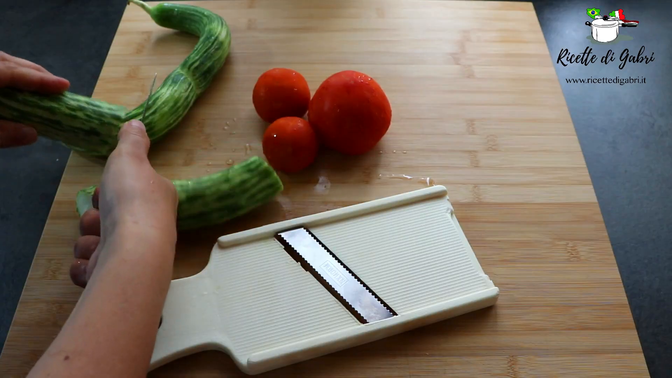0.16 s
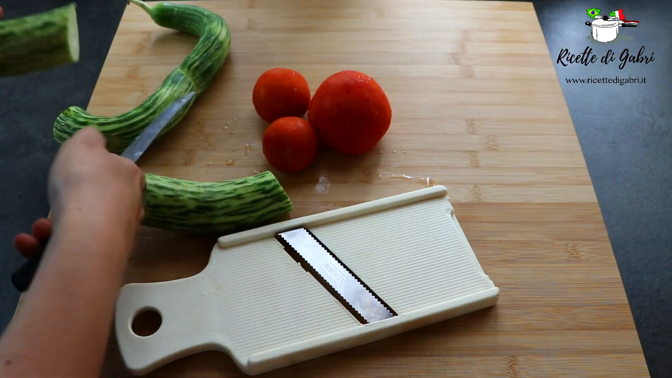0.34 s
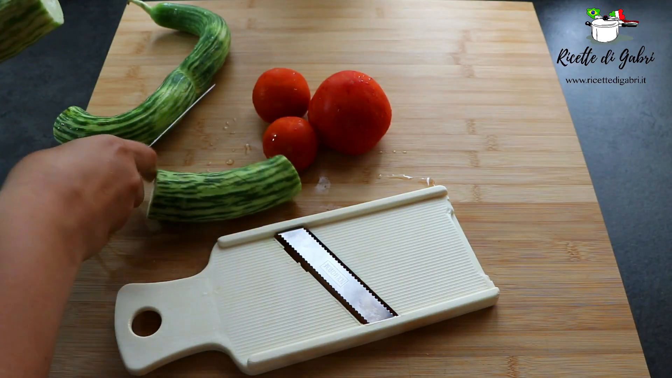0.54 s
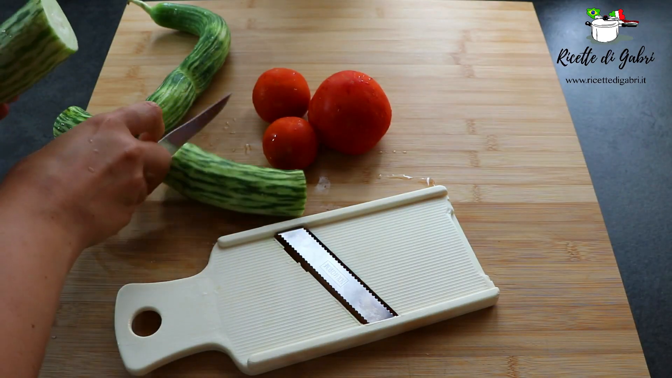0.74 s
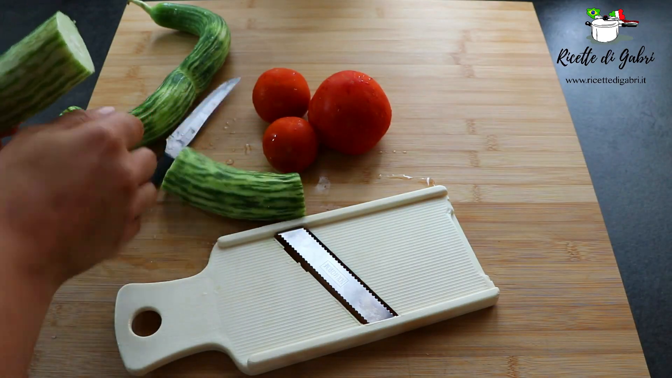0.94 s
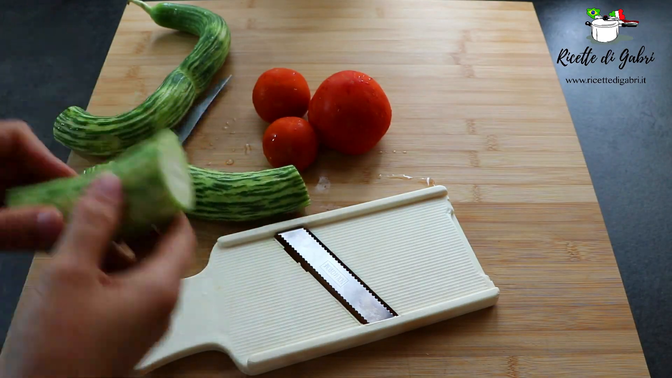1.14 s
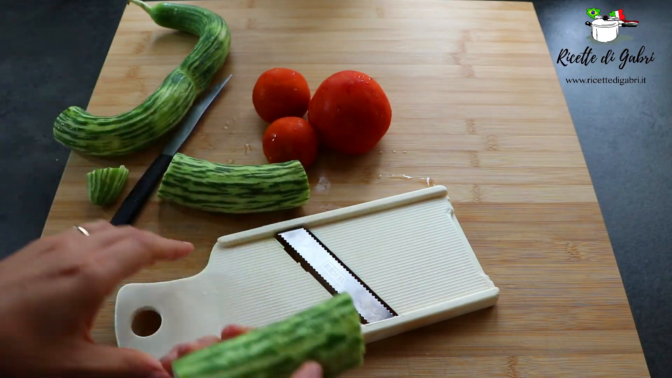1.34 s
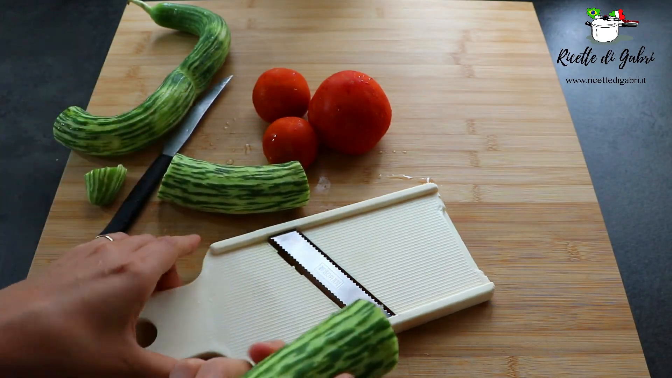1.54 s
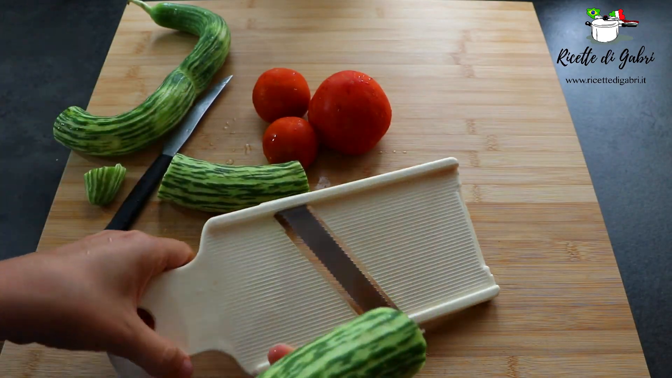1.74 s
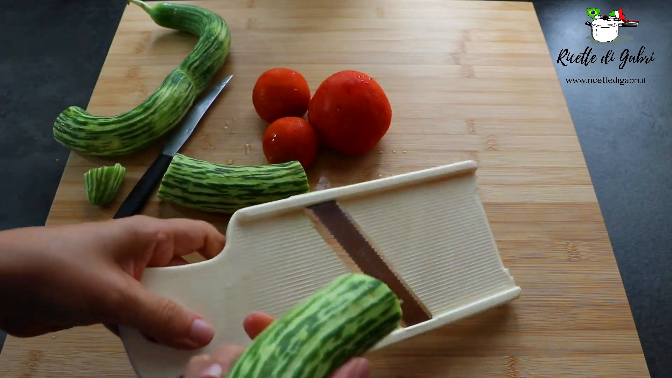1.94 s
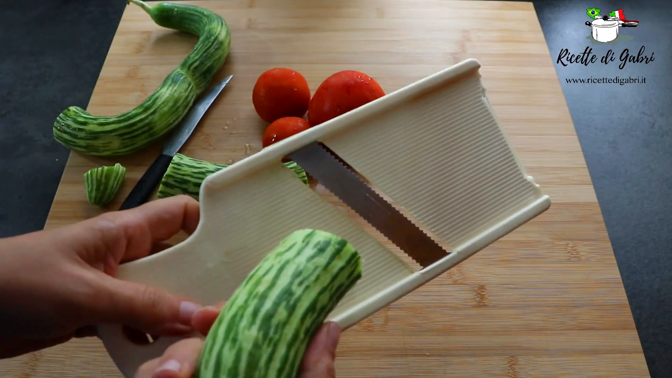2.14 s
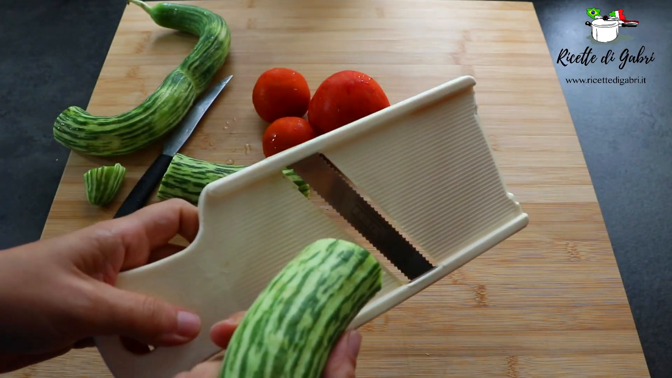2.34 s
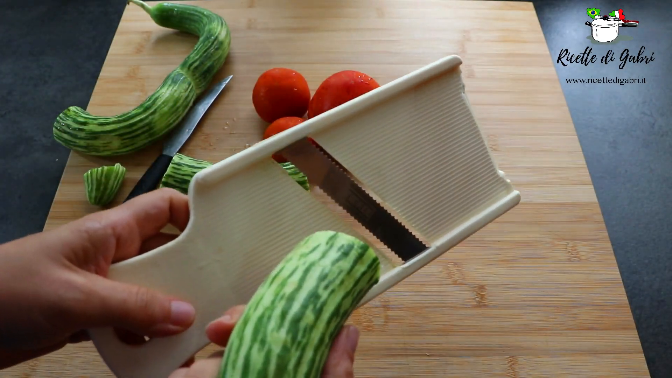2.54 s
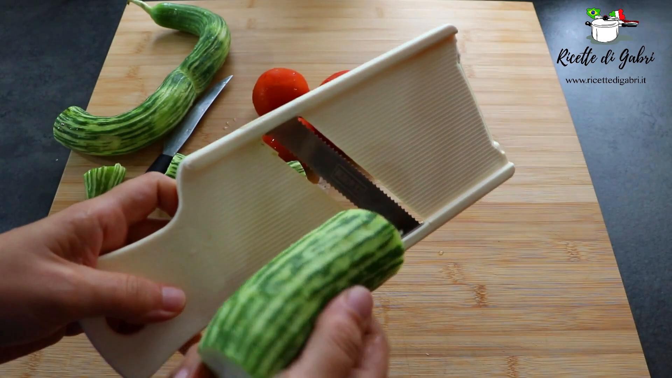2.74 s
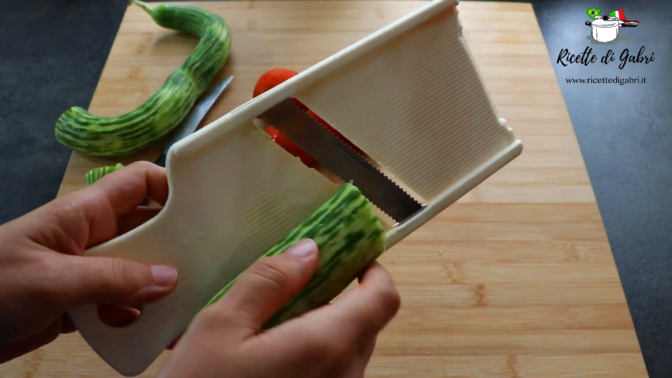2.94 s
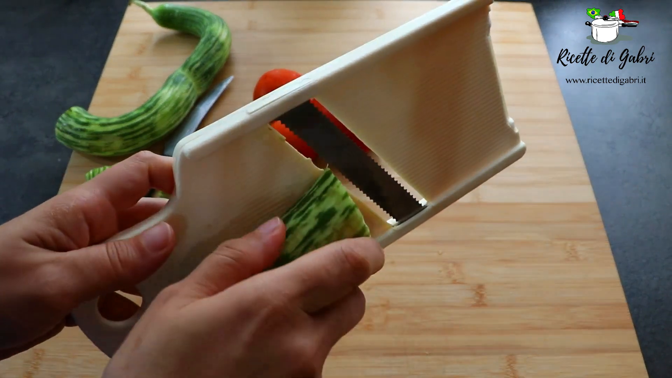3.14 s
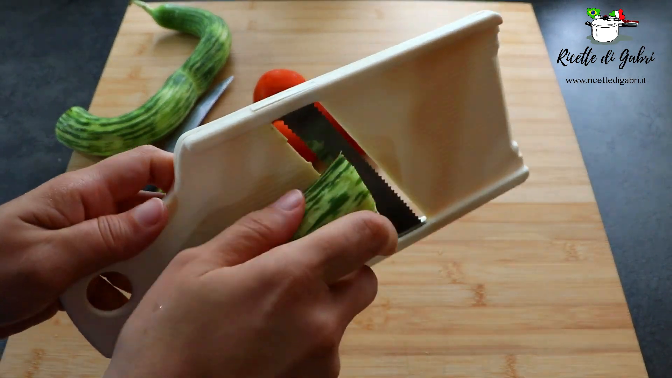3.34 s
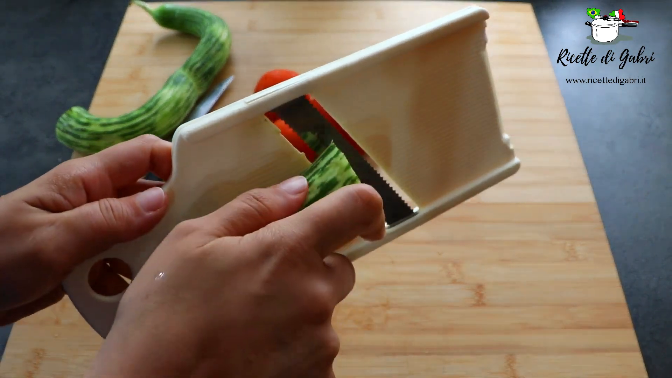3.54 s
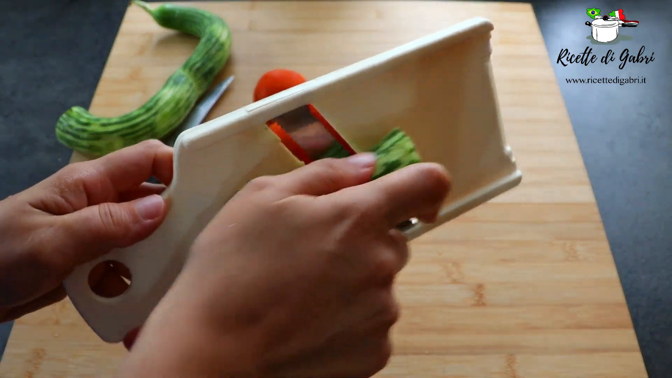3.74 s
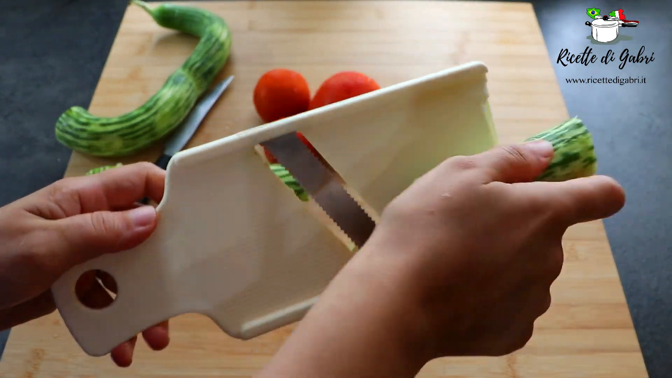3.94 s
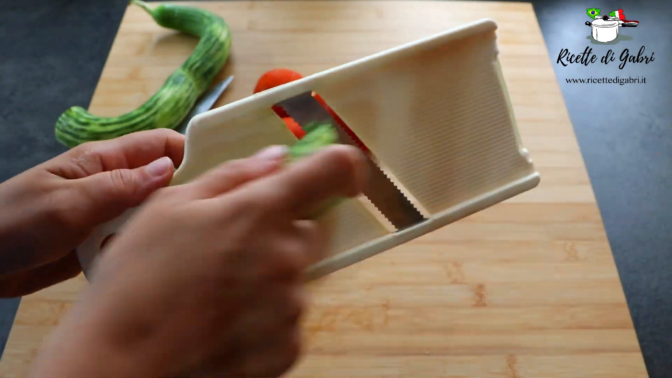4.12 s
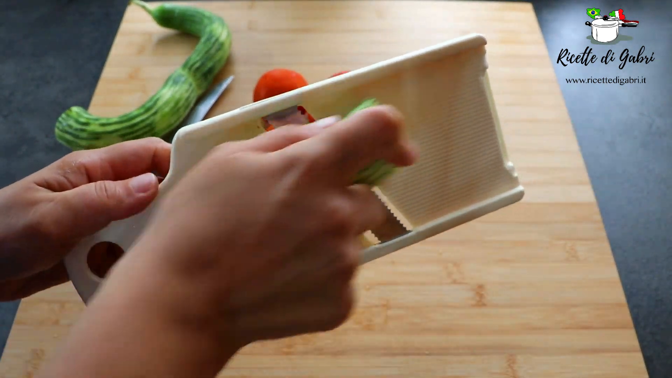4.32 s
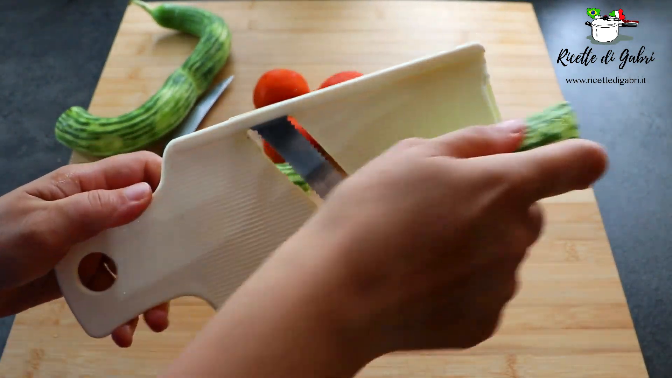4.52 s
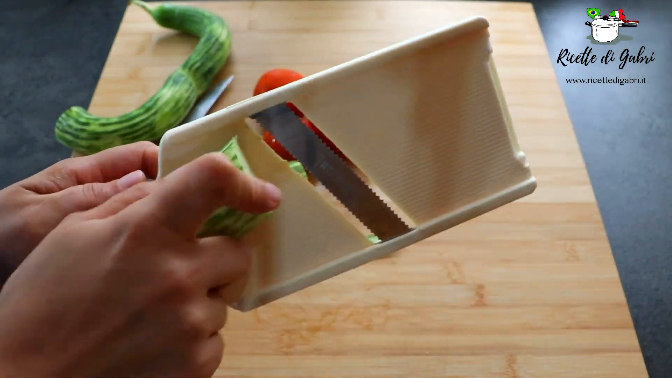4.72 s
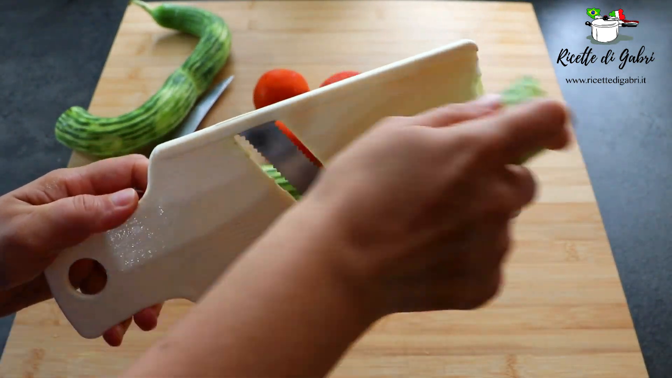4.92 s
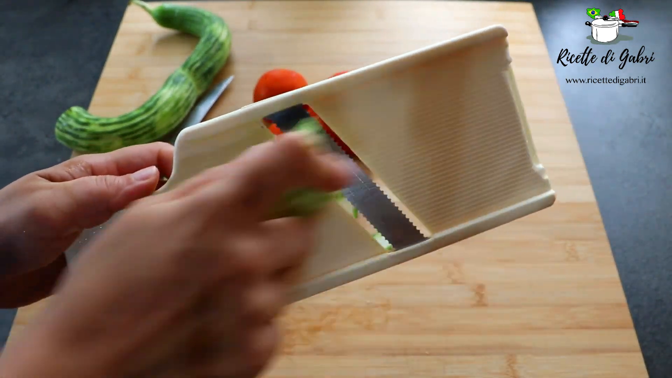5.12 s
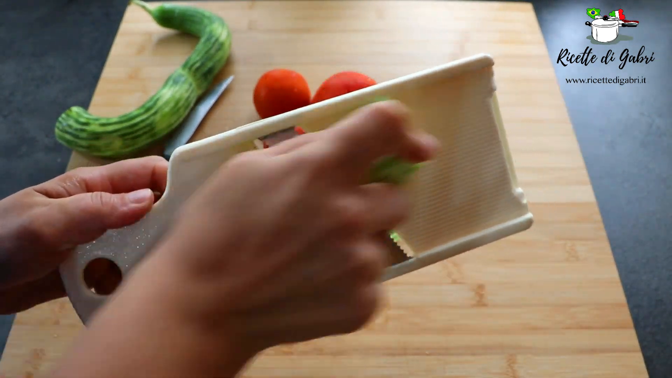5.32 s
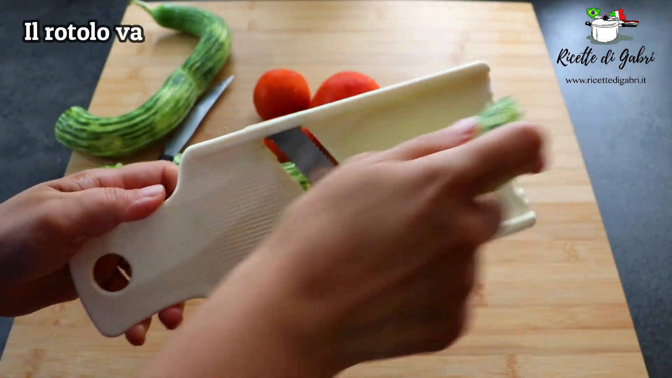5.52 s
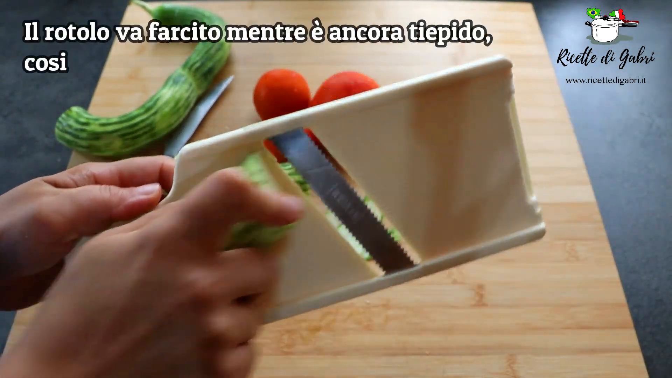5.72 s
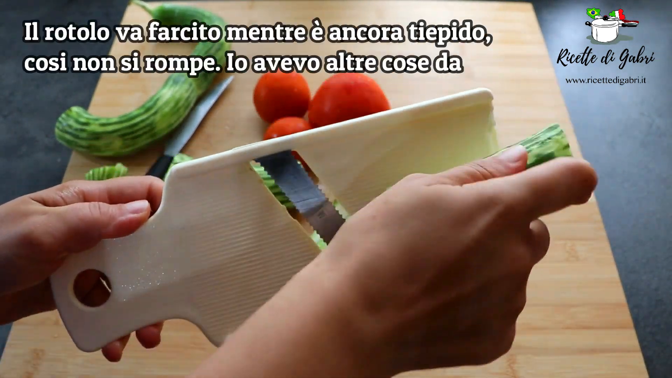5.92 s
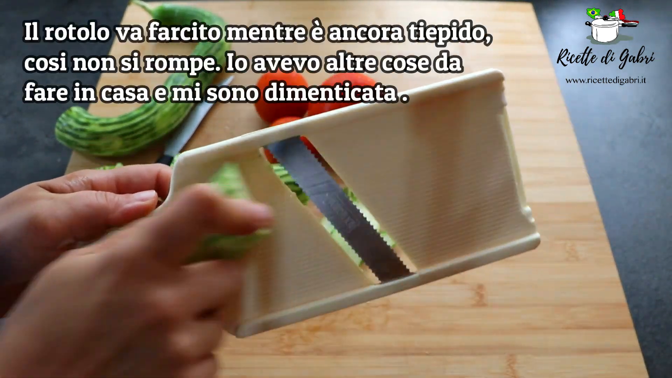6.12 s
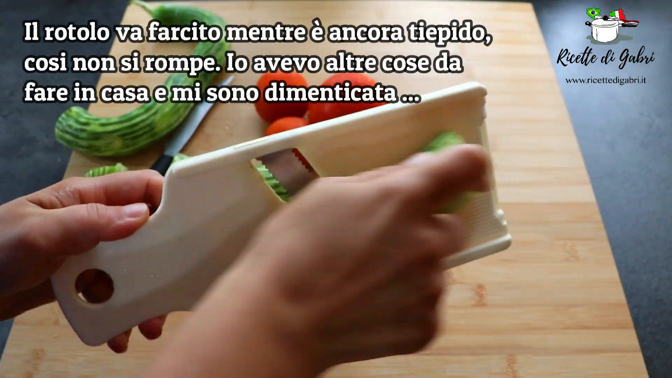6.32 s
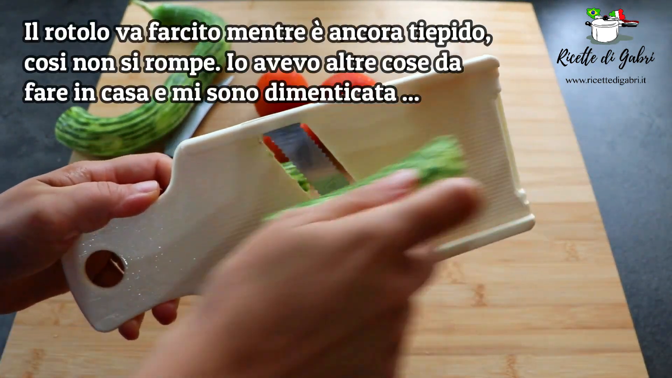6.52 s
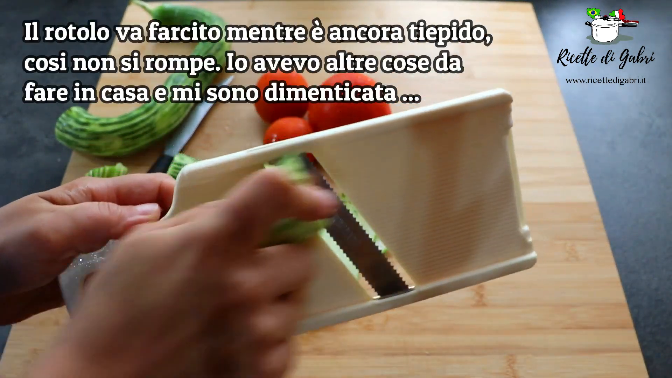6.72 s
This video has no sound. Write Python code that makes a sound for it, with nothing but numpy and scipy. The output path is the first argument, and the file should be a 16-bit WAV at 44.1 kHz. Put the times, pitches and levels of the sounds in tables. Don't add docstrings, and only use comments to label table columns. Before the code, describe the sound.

A marrow piece is set on a wooden board, a knife clatters down, then fast wet rasping strokes run over a ridged plastic slicer.

```python
import sys
import numpy as np
from scipy import signal
from scipy.fft import rfft, irfft, next_fast_len
from scipy.io import wavfile
from scipy.ndimage import uniform_filter1d, map_coordinates

SR = 44100
rng = np.random.default_rng(int(sys.argv[2]) if len(sys.argv) > 2 else 0)


def output_pcm(signal):
    pcm = np.clip(np.atleast_2d(signal).T, -1, 1) * 32767
    wavfile.write(sys.argv[1], SR, np.round(pcm).astype(np.int16))


def voltage_ratio(level):
    return 10 ** (np.asarray(level, float) / 20)


N = 302967
T = np.arange(N) / SR

# mode_hz, width_hz, level_db
RIBS = [(1037, 670, -7.5), (1427, 120, -0.5), (1662, 110, -3.5), (2030, 180, -3), (2484, 175, -7),
        (2870, 72, -4), (3320, 690, -11.5)]
# mode_hz, width_hz, level_db
HELD = [(666, 28, -1), (780, 144, -7)]
# mode_hz, width_hz, level_db
SOFT = [(182, 180, 5.5), (286, 244, 6.9), (532, 333, 2.4)]
# mode_hz, width_hz, level_db
KNIFE = [(1063, 145, 5), (1360, 125, 4), (1750, 310, 1.5), (2435, 190, -6), (2590, 78, -0.5),
         (2800, 810, -4), (4100, 1500, -9.5)]
# start_s, peak_db, plate_ring_db, treble_db
EXITS = [(3.9343, -31, -12, -8), (4.4985, -24.5, -12.5, -4), (4.9893, -22, -14.5, -4.5),
         (5.4785, -26, -12, -4), (5.9607, -30, -4.5, -27)]
# start_s, peak_db
SLAPS = [(4.222, -8), (4.7553, -9), (4.7645, -12), (5.7232, -3), (6.2023, -5), (6.4688, -19), (6.6873, -12),
         (6.6941, -5)]


def unit(x):
    return x / np.sqrt(np.mean(x ** 2) + 1e-20)


def along(points, hz):
    f, v = np.transpose(points)
    return np.interp(np.log(hz + 1), np.log(f + 1), v)


def wobble(rate):
    knots = np.clip(rng.standard_normal(int(N * rate / SR) + 4), -2, 2)
    return map_coordinates(knots, [T * rate])


def filtered(x, response):
    m = next_fast_len(N + SR // 2)
    h = response(np.fft.rfftfreq(m, 1 / SR))
    h = h / np.sqrt(np.mean(np.abs(h) ** 2))
    return irfft(rfft(x, m) * h, m)[:N]


def body(modes):
    def response(f):
        return sum((-1) ** k * voltage_ratio(db) * 1j * f * w / (c * c - f * f + 1j * f * w)
                   for k, (c, w, db) in enumerate(modes))
    return response


def grit(spiky_db):
    return unit(rng.standard_normal(N) * voltage_ratio(spiky_db * wobble(1500)))


def burst(ms, rise, crack, rows):
    t = np.arange(2048) / SR
    life = ms / 1000 + 1e-4
    shape = voltage_ratio(-10 * t / life) * (1 - np.exp(-t / (rise * life)))
    z = rfft(rng.standard_normal((rows, len(t))) * shape ** 2)
    even = irfft(z / np.abs(z) ** .8) * shape
    power = np.sum(even ** 2, axis=1, keepdims=True) / np.sum((shape / shape.max()) ** 4)
    return even / np.sqrt(power) * (1 + crack * voltage_ratio(-60 * t / 0.0017))


def knocks(events, ribs, plate, rise, crack, ms, thump_db, grows, early=0):
    # mode_hz, width_hz, level_db
    blade = [(4480, 690, 7.5), (5930, 290, 7), (6360, 640, 5), (8470, 790, 5), (11500, 1800, -4),
             (14600, 6200, -10.5)]
    force = np.zeros((4, N + 2048))
    for s, db, ring_db, treble_db in events:
        thump = thump_db + grows * (db + 20.0)
        gains = voltage_ratio([[db - 4.5], [db + ring_db + 3.5], [db + treble_db - 5.5], [thump]])
        force[:, round((s - early) * SR):][:, :2048] += gains * burst(ms, rise, crack, rows=4)
    return sum(filtered(f[:N], body(part)) for f, part in zip(force, (ribs, plate, blade, SOFT)))


def clatter(events, modes, ms, thump_db, grows):
    # mode_hz, width_hz, level_db
    steel = [(4880, 470, 1.5), (6110, 410, -1), (7230, 920, -4), (9100, 2000, -11.5), (11300, 3100, -38)]
    # mode_hz, width_hz, level_db
    wood = [(296, 140, -1.3), (636, 170, -0.5), (794, 200, -0.5)]
    force = np.zeros((3, N + 2048))
    for s, db, hz, treble_db in events:
        rattle = burst(ms, rise=0.03, crack=0.854, rows=3)
        rattle[0] = 0.49 * rattle[0] + 1.95 * signal.lfilter(*signal.iirpeak(hz, 2.2, SR), rattle[0])
        gains = voltage_ratio([[db - 7.0], [db + treble_db - 5.0], [thump_db + grows * (db + 20.5)]])
        force[:, round(s * SR):][:, :2048] += gains * rattle
    return sum(filtered(f[:N], body(part)) for f, part in zip(force, (modes, steel, wood)))


def blows(events, modes, blunt_hz):
    force = np.zeros(N)
    for s, db in events:
        force[round(s * SR)] = voltage_ratio(db + 14.5)
    ring = body(modes)
    return filtered(force, lambda hz: ring(hz) / (1 + 1j * hz / blunt_hz))


def rubs(events, modes, rise):
    force = np.zeros(N + 2048)
    for s, db, ms in events:
        force[round(s * SR):][:2048] += voltage_ratio(db) * burst(ms, rise, crack=0, rows=1)[0]
    return filtered(force[:N], body(modes))


def stroking():
    # start_s, length_s, pressure_db, time_to_full_pressure_s, first_ridge_rate_hz
    pushes = [(3.685, 0.24, -38, 0.083, 1350), (4.337, 0.146, -32.5, 0.0066, 1330),
              (4.857, 0.114, -31, 0.0067, 1250), (5.336, 0.133, -30.5, 0.011, 1050),
              (5.836, 0.108, -30, 0.005, 1050), (6.314, 0.128, -32, 0.009, 1150),
              (6.806, 0.15, -31.5, 0.012, 1340)]
    # ridge_clarity_db, fade_as_slice_comes_free_s, lateness_of_speeding_up (power)
    feel = [(0, .03, 5), (-4, .03, 3.5), (-4, .035, 2.5), (-4, .035, 2.5), (-5, .03, 2.2), (-7, .025, 2.5),
            (-8, .03, 2.5)]
    top_rate_hz, top_rate_at, fastest_at = 1900, 0.9, 0.77
    soft_start_db, touch_db, lift_db = -11.5, -10, -13.5
    press_db, speed, since = np.full(N, -120.), np.zeros(N), np.zeros(N)
    ridge_hz, song = np.full(N, top_rate_hz * 1.), np.zeros(N)
    for (s, length, db, rise, first_hz), (song_db, lift, late) in zip(pushes, feel):
        on = (T >= s) & (T < s + length)
        t = T[on] - s
        press_db[on] = db + soft_start_db * np.clip(1 - t / rise, 0, 1)
        press_db[on] += lift_db * np.clip(1 - (length - t) / lift, 0, 1) ** 2
        press_db[on] += touch_db * np.clip(1 - t / (0.22 * rise), 0, 1)
        song[on] = voltage_ratio(song_db)
        speed[on] = np.sin(np.pi / 2 * t / (fastest_at * length)) ** 2
        since[on] = t
        climb = np.sin(np.pi / 2 * t / (top_rate_at * length)) ** late
        ridge_hz[on] = first_hz + (top_rate_hz - first_hz) * climb
    return uniform_filter1d(voltage_ratio(press_db), size=130), speed, since, ridge_hz, song


def blade_hiss(tearing, speed):
    # point_hz, density_db_per_hz
    fizz_colour = [(1470, -31), (2500, -11), (2660, -15), (4090, -8), (4810, -3), (7110, -3.5),
                   (8550, -1.5), (10200, -7), (13600, -3), (15700, -11.5)]
    # mode_hz, width_hz, level_db
    edge_song = [(2900, 190, -5), (4810, 260, -2.5), (6000, 380, -1), (8400, 420, 2.5)]
    hiss = filtered(tearing, lambda hz: voltage_ratio(along(fizz_colour, hz)))
    hiss = hiss + voltage_ratio(-7) * filtered(grit(2), body(edge_song))
    z = signal.stft(hiss, nperseg=256)[2]
    patches = uniform_filter1d(rng.standard_normal(z.shape), size=5, axis=0)
    patches = uniform_filter1d(patches, size=9, axis=1)
    frame_speed = np.pad(speed, (0, 256))[::128][:z.shape[1]]
    tilt_db = 3.5 * np.linspace(-1, 1, len(z))[:, None] * (frame_speed - .6)
    z = z * voltage_ratio(tilt_db) * voltage_ratio(1.9 * unit(patches))
    return unit(signal.istft(z, nperseg=256)[1][:N])


def strokes():
    # mode_hz, width_hz, level_db
    sing = [(1100, 100, -3), (1470, 110, 0), (1720, 84, 1.5), (1920, 71, -1), (2500, 70, -5.5),
            (2870, 37, -7), (3230, 120, -17)]
    fizz, speed, since, ridge_hz, song = stroking()
    bite_db = 10 * np.exp(-since / 0.045)
    swell_db = 4 * speed
    ribs = fizz * voltage_ratio(2 + swell_db + 0.53 * bite_db)
    plate = fizz * voltage_ratio(-12 + bite_db + 0.29 * swell_db)
    turn = 2 * np.pi * np.cumsum(ridge_hz * (1 + .025 * wobble(70) + .065 * wobble(350))) / SR
    tearing = grit(1.8) * voltage_ratio(1.1 * wobble(200)) * (1 + .3 * np.sin(turn))
    ridges = song * voltage_ratio(-3.5 + 3.0 * wobble(180)) * (np.sin(turn) + 0.57 * np.sin(2 * turn + 1))
    scrape = voltage_ratio(1.5 + 1.5 * wobble(70)) * filtered(grit(2.5), body(RIBS))
    sung = filtered(ribs * (ridges + 0.86 * tearing), body(sing))
    bend = voltage_ratio(2 * wobble(40)) * filtered(grit(3), body(HELD + [(460, 90, 0)]))
    cut = voltage_ratio(3.5 + 0.73 * wobble(70)) * fizz * blade_hiss(tearing, speed)
    rasp = voltage_ratio(-6.0) * ribs * (0.53 * ridges + scrape)
    return cut + rasp + voltage_ratio(-17.0) * sung + voltage_ratio(0.5) * plate * bend


def hard_contacts():
    # start_s, peak_db, plate_ring_db, treble_db
    hard = [(3.041, -30, -6.5, -11), (4.2017, -17, -25, -0.5), (4.2064, -19, -18, -19),
            (4.213, -24.5, -8, -8), (4.337, -23, -35, -25), (4.7551, -22, -8, -10), (4.8623, -25, -16, -19),
            (5.1984, -11, -24, 1.5), (5.2084, -23, -6.5, -19), (5.3303, -37, 6, -14), (5.7594, -34, -4, -8),
            (6.311, -32, -15, -10), (6.32, -28, -20, -15), (6.238, -31, -7, -12), (6.0148, -32.5, -12, -16),
            (6.4685, -38, 4.5, -28), (6.8099, -22, -24, -18)]
    # start_s, peak_db, plate_ring_db, treble_db
    skids = [(4.2264, -22.5, -27, -6), (4.2344, -37, -22, -1), (4.7631, -17, -29, -7.5),
             (4.7715, -24, -31, -5), (5.2424, -33.5, -15, -6), (5.196, -30, -10, -15),
             (5.7229, -14, -13, -1), (6.2018, -11.5, -10.5, -1.5), (6.2104, -18, -21, -22),
             (6.6864, -16, -8, -11), (6.6932, -11, -18, -8)]
    # mode_hz, width_hz, level_db
    plate = [(697, 30, 0), (775, 50, -7)]
    out = knocks(hard, RIBS, plate, rise=0.04, crack=0.51, ms=9.4, thump_db=-32.5, grows=1.47)
    return out + knocks(skids, RIBS, plate, rise=0.49, crack=0, ms=9.4, thump_db=-33.0, grows=0.92)


def slaps():
    force = np.zeros(N)
    for s, db in SLAPS:
        force[round(s * SR):][:20] = voltage_ratio(db - 5.0) * np.hanning(20)
    return filtered(force, body([(805, 770, 0)]))


def palms():
    # start_s, peak_db
    landings = [(1.24, -48), (3.041, -29.5), (3.0538, -33.5), (4.2055, -32), (4.7535, -23.5), (5.48, -30),
                (5.7241, -27), (6.2028, -20.5)]
    return rubs([(s, db, 6.45) for s, db in landings], SOFT, rise=0.18)


def strikes():
    # start_s, peak_db
    hits = [(4.2019, -15.5), (2.9812, -21), (3.0412, -29), (4.7553, -19), (4.9862, -17), (5.9615, -22),
            (5.1982, -6), (5.7233, -12.5), (6.2025, -26), (6.6942, -9.5)]
    # mode_hz, width_hz, level_db
    shell = [(692, 28, 9.5), (1100, 140, -14), (1436, 81, -2.5), (1874, 170, -1), (2030, 88, -18),
             (2400, 67, 1.5), (2810, 95, -2), (3230, 90, -4), (3790, 50, -12), (4530, 150, -10),
             (6000, 330, -13)]
    return blows(hits, shell, 8200)


def rings():
    # start_s, level_db, mode_hz, width_hz
    ringing_modes = [(5.1982, -19, 694, 14), (5.1994, -31, 3500, 26), (5.7233, -27, 1780, 20),
                     (6.2, -41, 5300, 25), (5.7229, -25, 2300, 26), (6.202, -28, 3600, 22),
                     (6.201, -34, 2400, 55), (5.9616, -36, 1770, 27),
                     (4.2035, -20, 2870, 95), (6.4692, -17, 720, 45), (5.2085, -20, 2800, 200)]
    out, t = np.zeros(N + SR), np.arange(SR // 4) / SR
    for s, db, hz, width in ringing_modes:
        out[round(s * SR):][:len(t)] += voltage_ratio(db) * np.exp(-np.pi * width * t) * np.sin(2 * np.pi * hz * t)
    return out[:N]


def returns():
    # peak_s, fade_s, level_db
    drags = [(4.25, .07, -54), (4.52, 0.17, -50), (4.79, .06, -48), (5.23, .09, -45), (5.75, 0.09, -40),
             (6.23, .09, -39), (6.49, .16, -48), (6.72, 0.099, -37)]
    # mode_hz, width_hz, level_db
    glide = [(1500, 600, 0), (2500, 700, -3), (4600, 1400, 0), (6350, 1300, -2), (8300, 1500, -5)]
    gain = sum(voltage_ratio(db - 10 * np.where(T < s, (s - T) / 0.013, (T - s) / fade)) for s, fade, db in drags)
    return gain * voltage_ratio(1.5 * wobble(60)) * filtered(grit(2), body(glide))


def catches():
    # mode_hz, width_hz, level_db
    catch = [(450, 60, -2), (1750, 110, 0), (2900, 120, -1), (3550, 150, -7)]
    return rubs([(4.337, -29, 16), (5.329, -33, 9), (6.309, -38, 7)], catch, rise=.2)


def exits():
    # mode_hz, width_hz, level_db
    edge = [(930, 420, 1.5), (1765, 130, 12.5), (3000, 250, -5)]
    slips = [(3.925, -34, 9.5), (4.491, -31, 11), (4.503, -35, 9), (5.472, -29.5, 10.5)]
    out = knocks(EXITS, edge, HELD, rise=1.0, crack=0, ms=8.9, thump_db=-32.0, grows=0.43, early=0.0055)
    return out + rubs(slips, edge + HELD, rise=0.59)


def taps():
    # start_s, peak_db, plate_ring_db, treble_db
    touches = [(2.3106, -41, 7, -28), (2.354, -36.5, 3.5, -28), (2.753, -45, 10, -26),
               (2.768, -52, 12, -24), (2.786, -54, 12, -24), (2.8888, -47, -4, -19),
               (2.979, -28, -12.5, -8.5), (2.9914, -36.5, -3, -7), (3.0544, -39, -2, -10),
               (3.4136, -37, -6, -11.5), (3.4264, -40.5, -6, 1), (3.4394, -41, -8, 6)]
    # mode_hz, width_hz, level_db
    free = [(1230, 480, -6.5), (1765, 47, 8.5), (2070, 87, 4.5), (2400, 46, 7.5), (2850, 134, -0.5),
            (3700, 125, -7), (4470, 600, -8)]
    # mode_hz, width_hz, level_db
    loose = [(701, 25.5, 3.5), (780, 45, -2.5), (1050, 160, -19.5)]
    return knocks(touches, free, loose, rise=0.21, crack=0, ms=9.4, thump_db=-44.5, grows=0.15)


def scratches():
    # mode_hz, width_hz, level_db
    nail = [(720, 70, -2), (1820, 74, -0.5), (2230, 42, -3), (2790, 34, -11), (3640, 140, -12.5),
            (4420, 88, -9.5), (6450, 58, -16), (8550, 130, -20.5)]
    # mode_hz, width_hz, level_db
    chip = [(1700, 110, -3), (2080, 150, -6), (3600, 110, 1)]
    out = rubs([(3.413, -36.5, 12), (3.428, -42, 25)], nail, rise=0.36)
    return out + rubs([(5.958, -41, 6.5), (6.013, -36.5, 5.5)], chip, rise=.3)


def knife():
    # mode_hz, width_hz, level_db
    drop = [(1120, 126, 0.5), (1668, 196, 1.5), (2280, 82, -6.5), (2825, 180, -7), (3250, 53, -22.5),
            (3780, 52, -15.5), (4190, 150, -6.5), (4680, 63, -29), (5580, 270, -11.5)]
    # mode_hz, width_hz, level_db
    land = [(1130, 57, -5), (1337, 75, 0.5), (1510, 34, -0.5), (1915, 85, 0), (2260, 91, 2.5),
            (2850, 155, -4.5), (3420, 100, -8), (3970, 170, -6), (4550, 170, -9.5)]
    # mode_hz, width_hz, level_db
    rock = [(978, 120, -6), (1480, 37, -1.5), (1696, 62, 1.5), (2380, 210, -3.5), (2660, 100, -10),
            (2900, 78, -11), (3990, 220, -13), (5100, 65, -14), (5540, 180, -16.5)]
    # mode_hz, width_hz, level_db
    graze = [(1070, 180, 0.5), (2850, 80, 3), (3600, 130, -1.5), (4950, 190, -4), (6120, 200, -10.5),
             (6500, 150, -11), (7260, 130, -12), (8370, 400, -7.5)]
    # start_s, peak_db
    bounces = [(1.0, -17), (1.006, -15), (1.017, -21.5), (1.024, -12.5), (1.037, -19), (1.041, -14.5),
               (1.045, -10.5), (1.061, -11.5), (1.067, -13), (1.071, -14.5), (1.09, -15), (1.096, -14),
               (1.118, -10), (1.131, -11), (1.145, -21), (1.16, -18)]
    hard = blows([(0.7213, 2), (0.7688, -8)], drop, 5000) + blows([(0.9836, 0.93)], land, 6000)
    hard = hard + blows([(1.0553, -1), (1.1136, -12), (1.1255, -14)], rock, 5000)
    small = voltage_ratio(-7) * (blows(bounces[::2], KNIFE, 3000) + blows(bounces[1::2], RIBS, 3100))
    return hard + small + rubs([(0.878, -24.5, 9.9), (0.884, -27, 6.9), (0.9588, -25, 5)], graze, rise=0.19)


def board_contacts():
    # start_s, peak_db, pitch_hz, treble_db
    fall = [
        (0.7214, -3.5, 1590, -9),
        (0.7686, -12.5, 1300, -8.5),
        (0.7735, -15, 1320, -16),
        (0.8086, -26, 1410, -22),
    ]
    # mode_hz, width_hz, level_db
    flat = [(1150, 200, -14), (1350, 270, 2), (1650, 210, -1), (2500, 430, -0.5), (2870, 120, -4),
            (4100, 190, -20)]
    # start_s, peak_db, pitch_hz, treble_db
    rocking = [(0.879, -28, 2850, 1), (0.8854, -28, 1070, -10), (0.9587, -21, 1310, -0.5),
               (0.9842, -3.5, 2400, -14), (0.9878, -8.5, 1020, -11), (0.9947, -13.5, 3000, -2),
               (1.0104, -17.5, 1360, -17), (1.0323, -18, 2730, -17.5), (1.0558, -7.5, 1650, -12.5),
               (1.0849, -15, 1614, -13), (1.1045, -16.5, 1100, -25), (1.1145, -16, 1850, -8),
               (1.1335, -15, 1920, -33), (1.1508, -19.5, 1480, -30.5)]
    # start_s, peak_db, pitch_hz, treble_db
    hands = [(0.0094, -36.5, 1190, -1), (0.0962, -47, 1160, 8), (0.1784, -37.5, 1090, -27),
             (0.2152, -29, 1050, -32), (0.233, -40, 1150, -15), (0.3585, -39, 1400, -4),
             (0.674, -50, 1120, -7), (1.536, -39, 900, -30), (1.554, -44, 900, -35),
             (1.6133, -38, 1114, -9), (1.6456, -25, 1140, -16), (1.7365, -34, 1120, -7),
             (1.7425, -39, 2500, -2), (1.949, -33.5, 890, -15), (2.0253, -44, 2200, -10)]
    drags = [(0.361, -42, 9), (1.638, -36, 12), (1.612, -43.5, 12), (1.66, -45, 8.4),
             (1.733, -37, 8), (1.93, -52, 29), (1.952, -47, 11)]
    out = clatter(fall, flat, ms=3.3, thump_db=-30.5, grows=0.62)
    out = out + clatter(rocking, KNIFE, ms=4.4, thump_db=-32.5, grows=0.77)
    out = out + clatter(hands, KNIFE, ms=6.6, thump_db=-37.5, grows=0.27)
    return out + rubs(drags, KNIFE, rise=0.35)


def ticks():
    # start_s, peak_db
    clicks = [(0.0905, -41), (0.0953, -36.5), (0.7203, -30), (0.879, -28.5), (0.959, -33.5), (1.066, -41),
              (0.9947, -47.5), (4.23, -35)]
    return rubs([(s, db, 4.8) for s, db in clicks], [(8240, 1510, 1.0), (13300, 2400, -1.5)], rise=.1)


def slides():
    # peak_s, rise_s, fall_s, fizz_db, body_db
    brushes = [(0.01, 0.0021, 0.17, -32, -40), (0.65, 0.079, 0.067, -48, -46),
               (1.644, 0.1, 0.07, -43.5, -32.5), (1.74, 0.048, 0.017, -43, -32), (1.78, .06, .08, -46, -42),
               (1.955, 0.2, 0.08, -45, -38.5), (2.235, .06, .08, -55, -43),
               (3.415, 0.021, 0.056, -38, -37.5)]
    fizz, body_gain = np.zeros(N), np.zeros(N)
    for s, rise, fall, fizz_db, body_db in brushes:
        fade_db = -34.5 * np.where(T < s, (s - T) / rise, (T - s) / fall)
        fizz += voltage_ratio(fizz_db + fade_db)
        body_gain += voltage_ratio(body_db + fade_db)
    skin = [(3500, 690, -7.0), (6010, 1700, -5.0), (8450, 1500, -5), (13000, 3560, -12)]
    hiss = filtered(grit(4.2), body(skin))
    hollow = filtered(grit(1), body(KNIFE + [(850, 190, 5.7)]))
    return voltage_ratio(-8.0 + 1.3 * wobble(55.0)) * (fizz * hiss + body_gain * hollow)


def thuds():
    # start_s, peak_db
    booms = [(0.177, -18), (0.215, -19), (0.2305, -18), (0.248, -24.5), (0.299, -31), (0.337, -30),
             (0.566, -45), (0.677, -37), (0.704, -37), (0.794, -28), (0.953, -30.5), (1.077, -30),
             (1.138, -33), (1.342, -41), (1.399, -33), (3.028, -38)]
    # mode_hz, width_hz, level_db
    table = [(59.7, 13, -3), (92, 11.5, 9), (141.3, 13.6, 11), (173.3, 15.2, 10)]
    force = np.zeros(N)
    for s, db in booms:
        force[round(s * SR):][:50] = voltage_ratio(db - 2.5) * np.hanning(50)
    return filtered(force, body(table))


def walls(x):
    # band_hz, t60_s, level_db
    tiles = [(100, 0.21, 5.5), (510, 0.68, 0), (714, 0.52, -0.5), (1400, 0.65, -5), (4000, 0.68, -1.5),
             (5970, .72, -2), (9000, 0.47, 0.5), (15200, 0.34, -1)]
    out, step = np.zeros(N + SR), SR // 8
    wall_hz, t60, db = np.transpose(tiles)
    for i in range(0, N, step):
        hz, t, z = signal.stft(rng.standard_normal(SR // 2), SR, nperseg=256)
        level_db = along(list(zip(wall_hz, db)), hz)[:, None]
        fade_db = level_db - 60 * t / along(list(zip(wall_hz, t60)), hz)[:, None]
        tail = signal.istft(z * voltage_ratio(fade_db), SR, nperseg=256)[1]
        clumps_db = 2.5 * rng.standard_normal(len(tail) // 64 + 1).clip(-1.6, 1.6)
        tail = tail * voltage_ratio(clumps_db.repeat(64)[:len(tail)])
        wet = signal.fftconvolve(x[i:i + step], tail / np.linalg.norm(tail))
        out[i + 180:][:len(wet)] += wet
    return out[:N]


def rumble():
    # peak_s, level_db
    nudges = [(0.23, -30), (0.78, -30), (1.07, -36.5), (1.42, -35.5), (3.02, -52), (4.1, -49.5)]
    shoves = nudges + [(row[0], -60) for row in EXITS + SLAPS]
    rise_db_s, fall_db_s, still_db = 245, 57.5, -62
    shake = sum(voltage_ratio(db - np.maximum(rise_db_s * (s - T), fall_db_s * (T - s))) for s, db in shoves)
    low = unit(filtered(rng.standard_normal(N), body([(45, 36, -10.5), (85, 34, -0.5)])))
    return (shake + voltage_ratio(still_db)) * voltage_ratio(-7.5) * low


def kitchen():
    # point_hz, density_db_per_hz
    hum_colour = [(12, -32), (20, -7), (59, -9.5), (90, -29), (123, -4.5), (203, -4.5), (284, -3.5),
                  (375, -4), (469, -11), (713, -12.5), (996, -16.5), (2180, -23), (2960, -23.5),
                  (3910, -26), (15800, -31)]
    # start_s, end_s, pitch_hz, level_db
    whines = [(1.33, 1.55, 2010, -66), (2.15, 3.55, 3030, -69), (4.03, 4.25, 2015, -58),
              (6.05, 6.22, 2015, -55), (3.2, 3.42, 127, -53), (4.1, 4.2, 840, -60), (1.37, 1.52, 850, -55),
              (1.39, 1.45, 650, -54)]
    tone = filtered(rng.standard_normal(N), lambda hz: voltage_ratio(along(hum_colour, hz)))
    hum = voltage_ratio(-50 + 0.36 * wobble(6.1)) * tone
    for start, end, hz, level_db in whines:
        swell = np.clip(np.minimum(T - start, end - T) / 0.0081, 0, 1)
        whine = np.sin(2 * np.pi * hz * T + 0.21 * wobble(25.4))
        hum = hum + voltage_ratio(level_db + 0.62 * wobble(36)) * swell * whine
    return hum


def scene():
    slicer = strokes() + hard_contacts() + slaps() + palms() + strikes() + rings() + returns() + catches()
    light = exits() + taps() + scratches()
    board = knife() + board_contacts() + ticks() + slides()
    echo = walls(voltage_ratio(-10) * slicer + voltage_ratio(-12.5) * light + voltage_ratio(-7.0) * board)
    mono = slicer + light + board + echo + thuds() + rumble() + kitchen()
    return np.array([mono, mono])


def low_pass(x):
    return signal.sosfilt(signal.butter(12, 16810, fs=SR, output="sos"), x)


def record(dry):
    x = dry / (1 + np.abs(dry) ** 8) ** (1 / 8)
    colour = [(30, 15), (300, 8.9), (1000, 1), (3000, 3.0), (12000, 1)]  # Hz, dB per Hz
    noise = voltage_ratio(-73) * filtered(rng.standard_normal(N), lambda hz: voltage_ratio(along(colour, hz)))
    x = x + np.array([noise, -noise])
    x = signal.sosfiltfilt(signal.ellip(10, .1, 17, 15760, fs=SR, output="sos"), x)
    return low_pass(x)


dry = scene()
out = record(dry)
output_pcm(out)
```